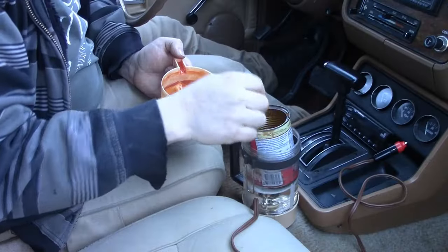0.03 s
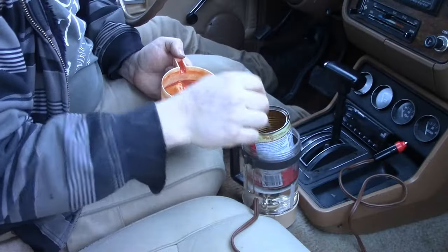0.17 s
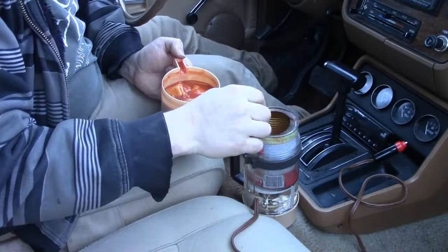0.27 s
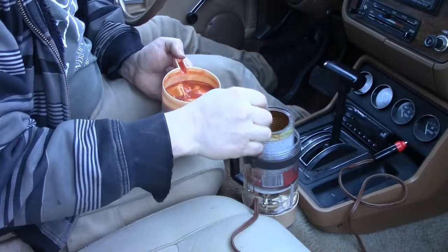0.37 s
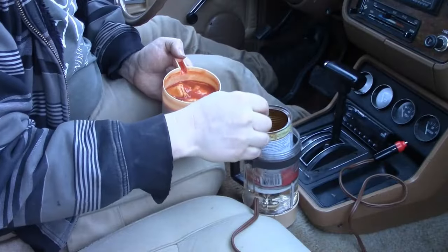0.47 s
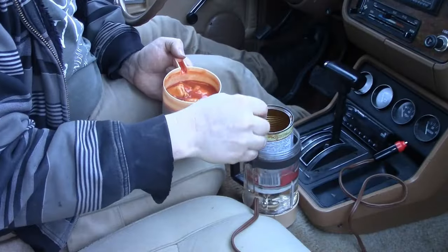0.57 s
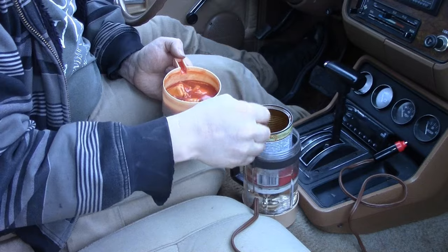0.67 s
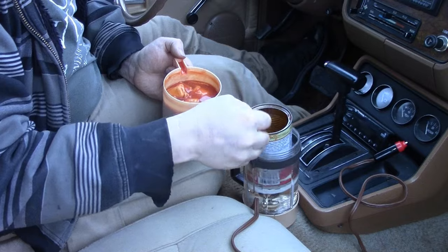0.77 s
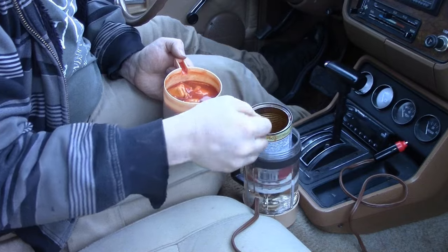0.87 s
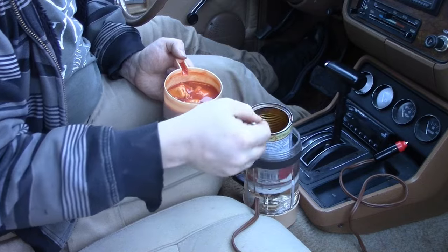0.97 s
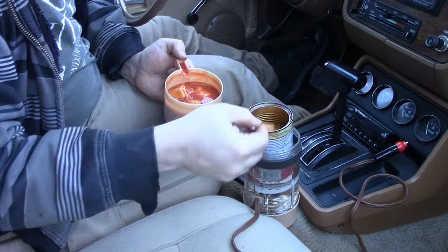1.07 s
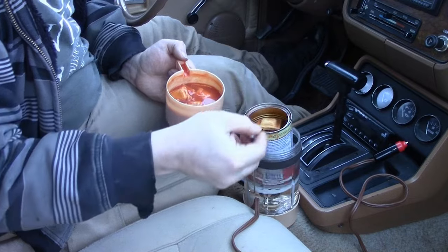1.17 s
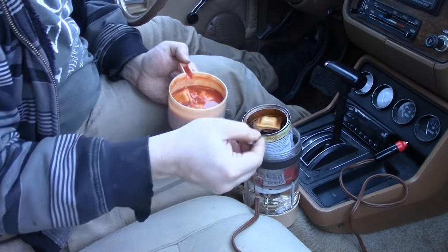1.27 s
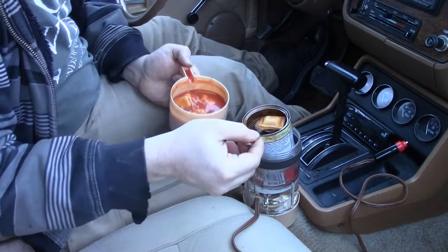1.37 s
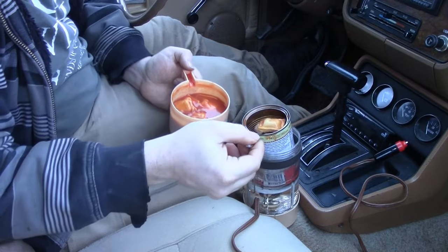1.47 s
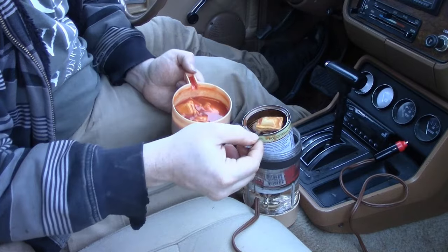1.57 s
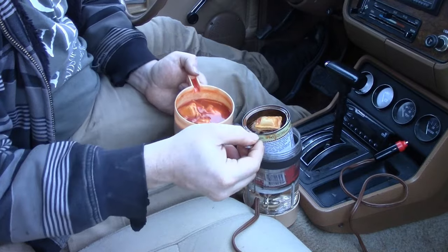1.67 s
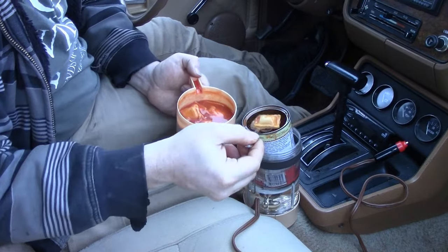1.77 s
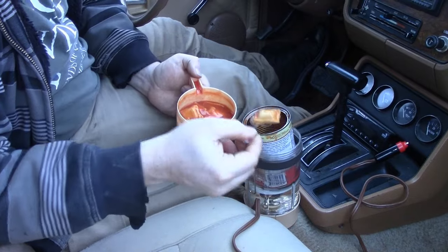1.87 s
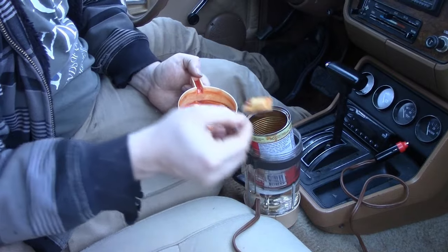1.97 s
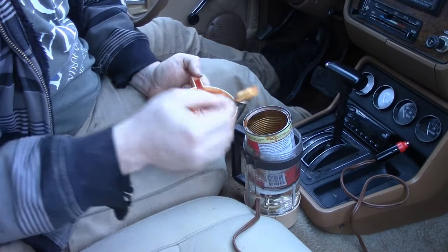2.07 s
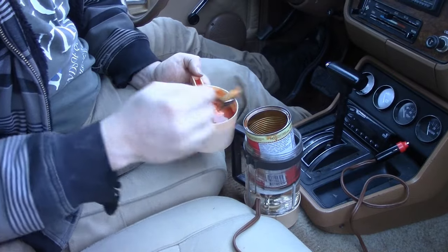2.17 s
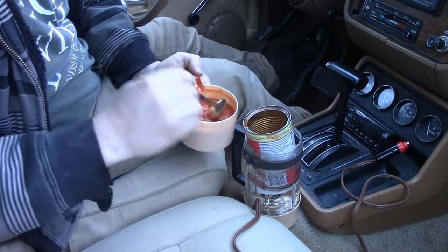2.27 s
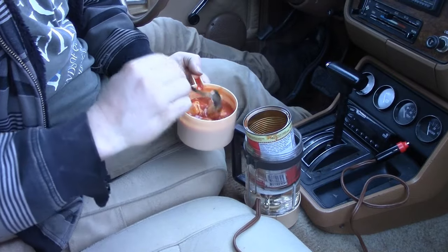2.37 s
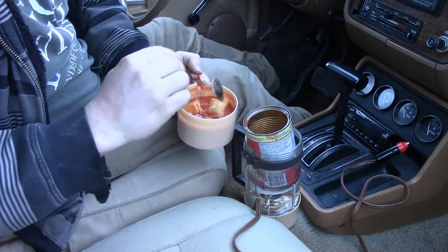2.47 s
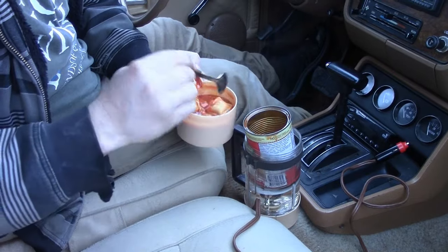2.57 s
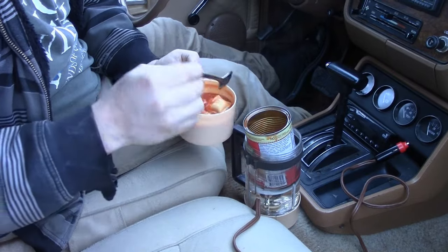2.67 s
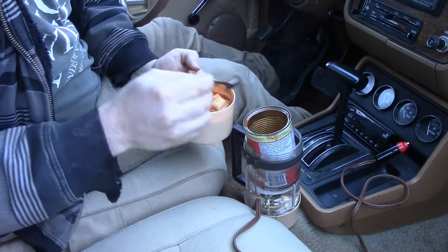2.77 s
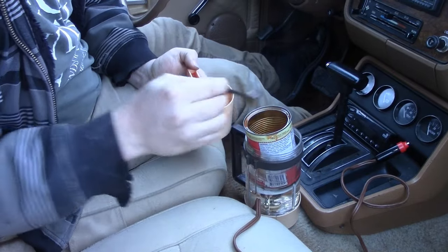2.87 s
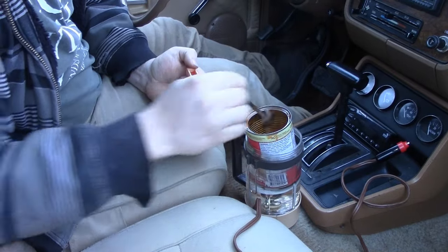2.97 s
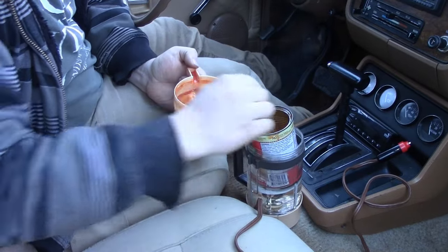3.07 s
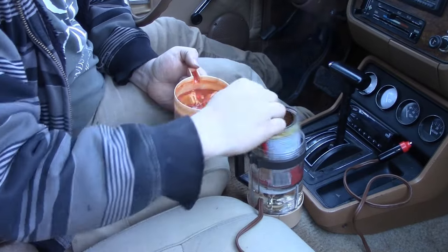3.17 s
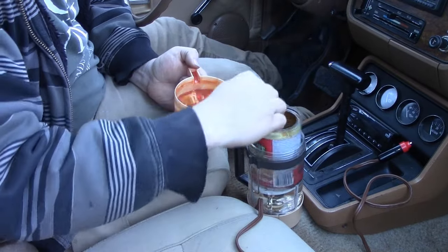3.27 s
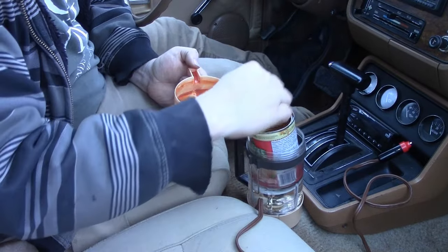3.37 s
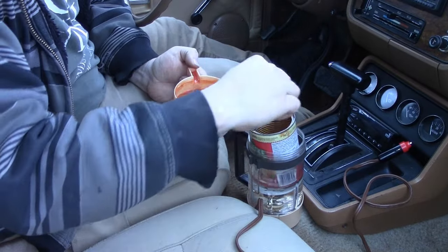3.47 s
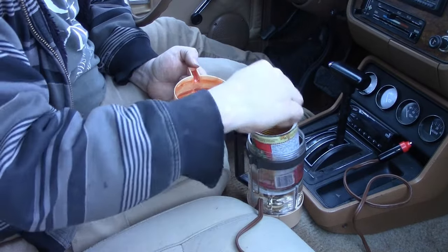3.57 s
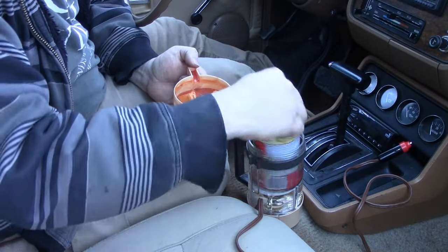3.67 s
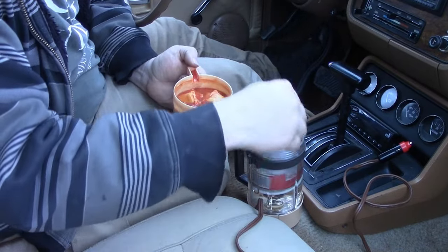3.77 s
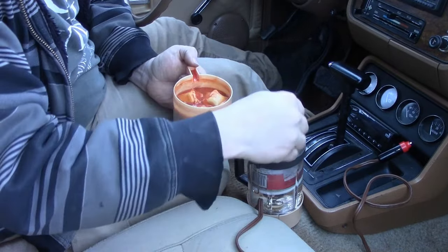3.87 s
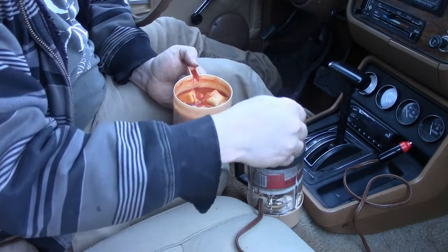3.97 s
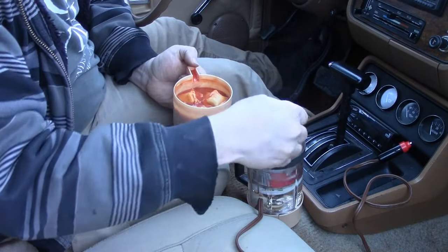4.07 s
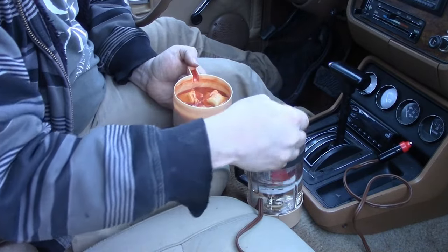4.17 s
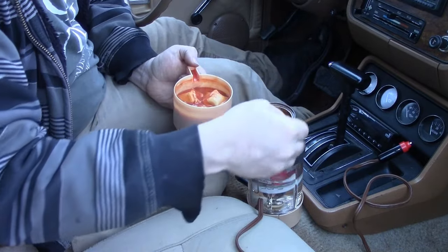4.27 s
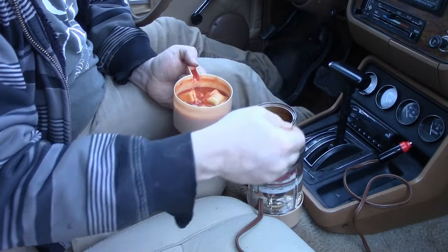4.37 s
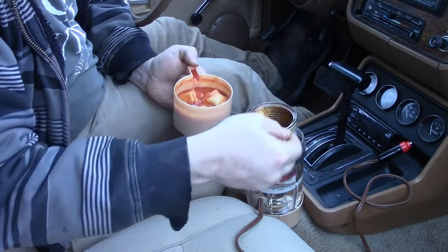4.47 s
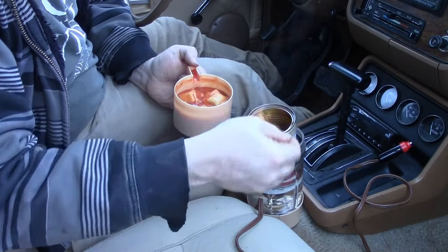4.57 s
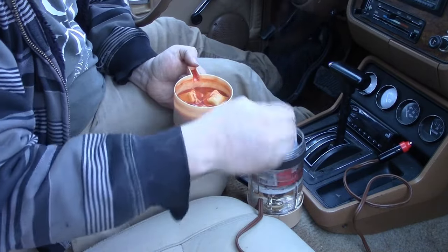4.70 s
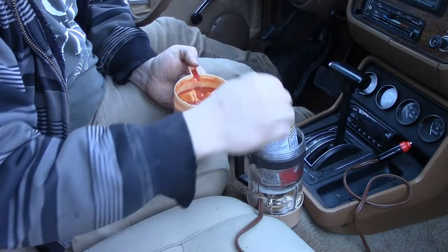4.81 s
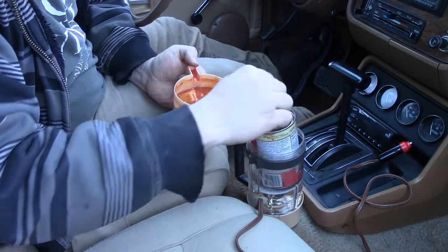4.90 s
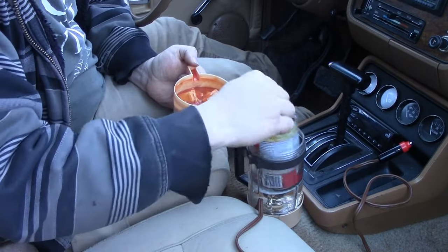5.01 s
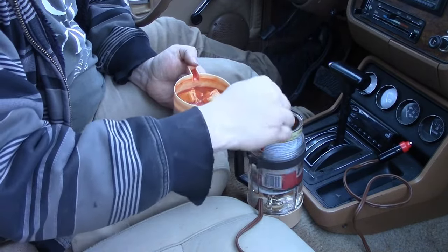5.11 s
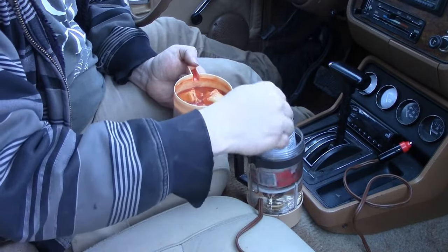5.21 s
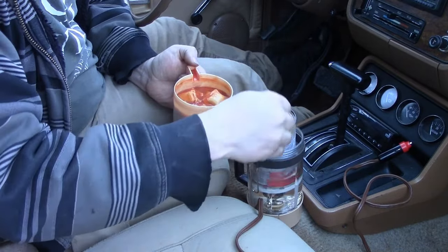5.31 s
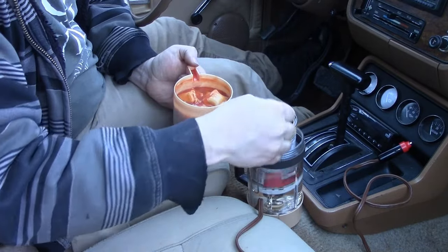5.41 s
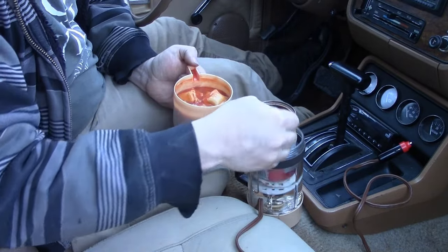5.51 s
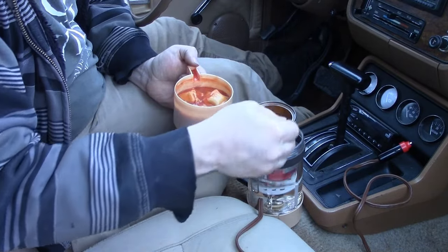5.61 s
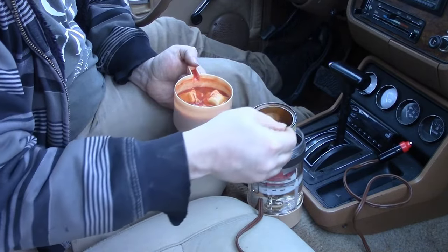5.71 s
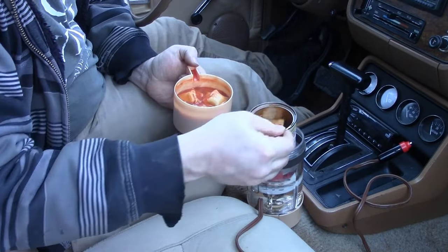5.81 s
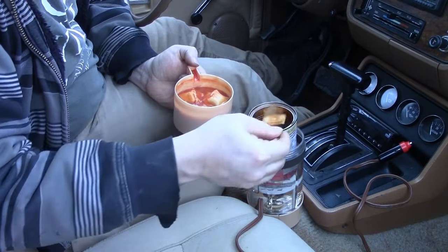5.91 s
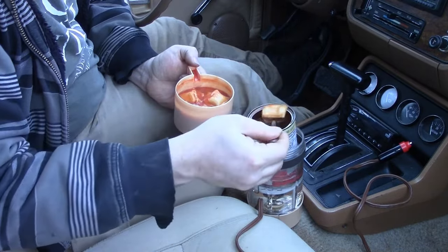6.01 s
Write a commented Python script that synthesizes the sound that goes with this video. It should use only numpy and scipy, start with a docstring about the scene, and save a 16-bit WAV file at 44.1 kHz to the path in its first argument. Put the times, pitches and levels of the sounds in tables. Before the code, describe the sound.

A spoon clinks against a thin ribbed can held in a car console, close to the microphone. Short tinny rings mix with gritty rubbing and low bumps. A fast purr of ticks rises over the ribs, followed by a pause with only soft cabin noise. A hard clink restarts the digging; small scrapes and taps gather into two strong knocks, then another rib rattle and soft scuffing. The padded cabin gives only a brief reflection.

```python
"""In the small padded cabin of a parked car, a spoon digs in a half-empty tin can held in the console.
It clinks on the wall and rattles up over the ribs, ringing wall modes, air column and cup holder as decaying
sines plus a noise crack. In between it rubs: clumped noise through the same tin, over a console rumble.
The cabin answers at once with a short noise tail; a faint wavering hum and steady hiss lie underneath."""
import sys
import numpy as np
from scipy import signal
from scipy.fft import rfft, irfft, next_fast_len
from scipy.io import wavfile
from scipy.ndimage import uniform_filter1d, map_coordinates

SR = 44100
rng = np.random.default_rng(int(sys.argv[2]) if len(sys.argv) > 2 else 0)


def transcribe(u):
    """Save the signal u as a 16-bit wav file named by the first command-line argument.

    u: samples, shape (n,) or (channels, n), limited to [-1, 1]; the rate is SR.
    q: integer samples, one column per channel.
    """
    v = np.clip(np.atleast_2d(u).T, -1, 1)
    q = np.round(v * 32767).astype(np.int16)
    wavfile.write(sys.argv[1], SR, q)


N = 266805


def amp(db):
    """dB to gain."""
    return 10 ** (np.asarray(db) / 20)


def unit(x):
    """x at rms 1."""
    return x / np.sqrt(np.mean(x ** 2) + 1e-20)


def along(points, hz):
    """Read (Hz, value) points on a log frequency axis."""
    point_hz, values = np.transpose(points)
    return np.interp(np.log(hz + 1), np.log(point_hz + 1), values)


def curves(rows):
    """One value per sample for each column after the time."""
    s, *columns = np.transpose(rows)
    return [np.interp(np.arange(N) / SR, s, column) for column in columns]


def wobble(rate):
    """A smooth random curve, rate knots a second."""
    knots = rng.standard_normal(int(N * rate / SR) + 4)
    return map_coordinates(knots, [np.arange(N) * rate / SR])


def filtered(x, response):
    """Shape x by a complex response of frequency, padded so that nothing wraps round."""
    n = x.shape[-1]
    m = next_fast_len(2 * n)
    return irfft(rfft(x, m) * response(np.fft.rfftfreq(m, 1 / SR)), m)[..., :n]


def stereo(mid, side):
    """Left and right from their sum and difference."""
    return np.array([mid + side, mid - side])


# Spectrum of the cabin air and microphone noise, relative: pitch_hz, level_db (per Hz)
HISS_SPECTRUM = [(12, -64), (20, -21.5), (69, -18.5), (84, -26.5), (108, -10), (135, -16), (279, -15.5),
                 (391, -18), (705, -20.5), (1200, -23), (1680, -23), (15000, -38), (16300, -51)]
# Left-right likeness of the hiss: pitch_hz, likeness (0 to 1)
HISS_LIKENESS = [(60, 0.86), (240, 0.1783), (950, 0.27), (3770, 0.28), (15000, 0.67)]
HISS_DB = -63.5  # rms over both channels


def hiss():
    """Steady cabin air and microphone noise: shaped noise, its width set by frequency."""
    def response(hz):
        turn = np.arccos(np.clip(along(HISS_LIKENESS, hz), -1, 1)) / 2
        notch = 1 - .75 * np.exp(-((hz - 104) / 18) ** 2)  # room for the hum
        return amp(along(HISS_SPECTRUM, hz)) * notch * [np.cos(turn), np.sin(turn)]
    mid, side = filtered(rng.standard_normal((2, N)), response)
    return amp(HISS_DB) * unit(stereo(mid, side))


# Swells of the hum: time_s, level_db (rms)
HUM_SWELLS = [(0.0, -69), (0.13, -78), (0.89, -67), (1.4, -78), (1.87, -63), (2.19, -73.5), (2.73, -61),
              (3.2, -76.5), (3.25, -86.5), (4.24, -58.5), (4.43, -87), (5.15, -93), (5.24, -59.5),
              (6.05, -90)]


def hum():
    """A low sine that swells, its pitch wavering smoothly about 104 Hz."""
    db, = curves(HUM_SWELLS)
    hz = 103.8 + 1.2 * wobble(4)
    return np.sqrt(2) * amp(db) * np.sin(2 * np.pi * np.cumsum(hz) / SR)


# Decay of the padded cabin: pitch_hz, t60_s
CABIN_DECAY = [(300, 0.14), (2000, 0.077), (10000, 0.028)]
# Colour of the cabin's answer before levelling: pitch_hz, level_db, likeness (left-right, 0 to 1)
CABIN_ANSWER = [(300, -5, .93), (2000, -3, .94), (5000, 0.5, .8), (12000, 0.5, .7)]


def cabin(x, wet_db):
    """Direct sound plus the cabin's short answer: a noise tail that dies fastest in the treble."""
    hz, t, tail = signal.stft(rng.standard_normal((2, SR // 12)), SR, nperseg=128)
    at, db, alike = np.transpose(CABIN_ANSWER)
    turn = np.arccos(along(np.c_[at, alike], hz))[:, None] / 2
    tail_db = along(np.c_[at, db], hz)[:, None] - 60 * t / along(CABIN_DECAY, hz)[:, None]
    tail = tail * amp(tail_db) * [np.cos(turn), np.sin(turn)]
    mid, side = signal.istft(tail, SR, nperseg=128)[1]
    answer = stereo(mid, side) / np.linalg.norm(mid)
    late = np.pad(x, (60, 0))[None]  # the answer starts 60 samples after the direct sound
    wet = signal.fftconvolve(late, answer, axes=1)
    return x + amp(wet_db) * wet[:, :len(x)]


# Times the spoon is inside the can: start_s, end_s
SPOON_IN_CAN = [(0, 1.6), (3.2, 6.1)]
# Levels while the spoon merely stirs: rub_db, swish_db, boom_db
STIRRING = (-77, -77, -68.5)
# Scuffs between the knocks: peak_s, span_s (swell or fade by about 17 dB; below 0.01 plays as 0.01),
# rub_db, swish_db, boom_db
SCUFF_SWELLS = [(.03, -1.2, -63, -86, -53.5), (0.224, 0.04, -70, -85, -48), (0.388, 0.1, -51, -59, -46),
                (.55, 0.11, -50.5, -62, -46), (0.781, 0.03, -54.5, -73, -50), (.85, 0.66, -70, -67.5, -65),
                (1.032, 0.1239, -35, -42, -45.5), (1.12, 0.19, -49, -65, -52),
                (1.236, 0.15, -62, -82, -51.5), (3.3, 0.104, -48.5, -58.5, -44),
                (3.52, -0.45, -59.5, -79, -47), (3.7, 0.0662, -66, -68, -46.5),
                (3.79, 0.02, -48, -57, -46.5), (3.883, 0.0669, -56, -67, -45),
                (4.077, 0.02, -62.5, -68, -54.5), (4.258, 0.06, -58.5, -67, -47.5),
                (4.43, 0.18, -84, -87, -57.5), (4.62, 0.07, -66, -70, -57.5),
                (4.902, 0.2, -59.5, -82, -54.5), (5.075, .05, -49, -70, -67),
                (5.105, 0.04, -49.5, -50, -68), (5.216, 0.3, -54.5, -79, -46.5),
                (5.408, -0.14, -50, -63, -49), (5.68, 0.26, -75, -80, -47.5),
                (5.85, -0.25, -49.5, -78, -50), (5.98, 0.33, -57.5, -66, -57.5)]
SCUFF_CREST = 0.19  # rounded share of the swell


def scuffing():
    """Gains of wall rubbing, swish and boom: steady stirring plus scuffs that swell and fade alike."""
    t = np.arange(N) / SR
    inside = sum(1. * (t >= start) * (t < end) for start, end in SPOON_IN_CAN)
    gain = amp(np.reshape(STIRRING, (-1, 1))) * uniform_filter1d(inside, size=SR // 10)
    for peak, span, *db in SCUFF_SWELLS:
        distance = np.hypot((t - peak) / max(span, .01), SCUFF_CREST) - SCUFF_CREST
        gain = np.hypot(gain, amp(np.reshape(db, (-1, 1))) * amp(-20 * distance))
    return gain


# Spectrum of the console rumble, relative: pitch_hz, level_db (per Hz)
RUMBLE_SPECTRUM = [(12, -31.5), (22, -3.5), (60, -5.5), (95, -3), (125, -5), (165, -2), (220, -16.5),
                   (300, -13), (420, -24), (880, -120)]
RUMBLE_DB, RUMBLE_REST_DB = -9.5, -78  # re the boom; at rest
RUMBLE_AVERAGE_S = .3  # the boom is averaged over this long


def rumble(boom_gain):
    """The hand shakes can and console: lumpy low noise that follows the averaged boom."""
    smooth_boom = uniform_filter1d(boom_gain, int(RUMBLE_AVERAGE_S * SR))
    gain = amp(RUMBLE_DB) * smooth_boom + amp(RUMBLE_REST_DB)
    lumps = amp(2.5 * wobble(12))
    shake, sway = filtered(rng.standard_normal((2, N)) * lumps, lambda f: amp(along(RUMBLE_SPECTRUM, f)))
    return gain * unit(stereo(shake, amp(-16) * sway))


def resonant(modes, blur):
    """Response of (Hz, dB, t60) modes, each widened by blur."""
    def response(f):
        total = 0
        for k, (centre, db, t60) in enumerate(modes):
            width = blur / t60
            total = total + (-1) ** k * amp(db) * 1j * f * width / (centre ** 2 - f * f + 1j * f * width)
        return total
    return response


# Wall modes of the tin, shared with the contacts: pitch_hz, level_db (relative), t60_s (before damping)
TIN_MODES = [(899.3, 0, 0.067), (1042, -1.5, 0.051), (1150.6, 1, 0.043), (1247, -4.5, 0.068),
             (1345, -7, 0.089), (1647, -2.5, 0.029), (1825, -4.5, 0.055), (1957, 0, 0.045),
             (2092, 1.5, 0.035), (2449, 3.5, 0.018), (2584, -5, 0.015), (2745, -5, 0.039), (3052, 1, 0.02),
             (3297, 2.5, 0.023), (3700, -1, 0.025), (3650, -28.5, .05), (4046, -8, 0.029),
             (4120, -11, 0.044), (4508, -2.5, 0.027), (4460, -27, 0.069), (4900, -6.5, 0.019),
             (5000, -23, .04), (5570, -6, 0.013), (6360, -5, 0.045), (6800, 0, 0.052), (7280, -7, 0.065),
             (8040, -11.5, 0.087), (8440, -6.5, 0.0354), (7600, -20.5, 0.012), (9000, -19.5, 0.12)]
# Spectrum of the spoon's edge, shared with the contacts, before a treble tilt: pitch_hz, level_db (per Hz)
EDGE_SPECTRUM = [(880, -35.5), (1500, -7), (2000, -3), (2840, -9), (3540, -5), (4820, -14.5),
                 (10300, -23.5), (15200, -38), (16300, -39)]


def edge_response(f, tilt):
    """The spoon edge's colour, thinned below 5.5 kHz."""
    return amp(along(EDGE_SPECTRUM, f)) * np.minimum(f / 5500, 1) ** tilt


def rubbing():
    """Clumped grains of friction excite the same tin as the contacts; the console rumbles along."""
    rub_gain, swish_gain, boom_gain = scuffing()
    clumps = 2 * wobble(70)
    grains = lambda: rng.standard_normal(N) * amp(clumps + 3.1 * wobble(500))
    high = resonant([m for m in TIN_MODES if 1500 < m[0] < 4900], blur=5.4)
    hollow = [(305.0, 3.2, 0.098), (665, 5.7, 0.15)]  # two deep modes below the wall's own
    low = resonant(hollow + [m for m in TIN_MODES if m[0] < 1500], blur=11.0)
    # a soft, wet contact passes less of the upper modes
    rub = unit(filtered(grains(), lambda f: high(f) / (1 + (f / 3600) ** 4)))
    swish = unit(filtered(grains(), lambda f: edge_response(f, tilt=3)))
    boom = unit(filtered(grains(), low))
    scraped = rub_gain * rub + swish_gain * swish + boom_gain * boom
    return cabin(scraped, wet_db=-11) + rumble(boom_gain)


def ring(t, hz, db, t60, rise, hold, phase=0):
    """Sum of sines that build up over rise seconds, are fed for hold seconds, then die."""
    col = lambda v: np.reshape(v, (-1, 1))
    free = (t ** 4 + hold ** 4) ** .25 - hold  # stays near zero while the sine is fed
    sines = amp(col(db) - 60 * free / col(t60)) * np.sin(2 * np.pi * col(hz) * t + col(phase))
    return sines.sum(0) * (1 - np.exp(-t / rise))


# How much a full-scale blow at 2 kHz favours the modes at its spot; more per dB of blow, per octave up
FOCUS_DB, FOCUS_GROWS, FOCUS_DB_PER_OCTAVE = 16, .3, 6.5


def wall_ring(t, db, wall_hz, low_hz, low_db, edge_db, hold, damping):
    """Tin wall: the spot struck favours nearby modes and pulls the nearest to its own pitch."""
    hz, level, t60 = np.transpose(TIN_MODES)
    low, high = hz < 1500, hz > 4900
    focus_db = FOCUS_DB + FOCUS_GROWS * db + FOCUS_DB_PER_OCTAVE * np.log2(wall_hz / 2000)
    off = np.log(np.where(low, low_hz, wall_hz) / hz)
    favour = np.where(low, 12, focus_db) * np.tanh((off / 0.11) ** 2)
    share = level - favour + 3.5 * rng.standard_normal(len(hz))
    pull = off * np.exp(-(off / 0.044) ** 2)
    loaded_hz = hz * np.exp(pull + 0.0074 * rng.standard_normal(len(hz)))
    # each group of modes divides the energy that the blow gives it
    for group, group_db in (low, low_db + 3.5), (high, edge_db - 8.0), (~low & ~high, -2):
        share[group] += group_db - 20 * np.log10(np.linalg.norm(amp(share[group])))
    life = t60 / np.where(low, damping ** .6, np.where(high, 1.3 * damping ** .4, damping))
    phase = 2 * np.pi * rng.random(len(hz))
    return ring(t, loaded_hz, share, life, 0.00019 + 0.17 * hold, 0.5 * hold, phase)


def air_column(t, hz, db, hold, damping):
    """The can's air column booms as one short sine."""
    return ring(t, hz, db + 2.5, .045 / damping, 0.00047 + .3 * hold, 1.8 * hold)


def cup_holder(t, db, hold):
    """The cup holder knocks on two low modes."""
    return ring(t, [275, 315], db + np.array([-4, 2.5]), [.05, .07], 0.0068, 0.77 * hold)


def edge_crack(t, db, hold, grit):
    """The spoon's edge cracks: a burst of bright noise, longer for a longer contact."""
    fading = np.sqrt(t * t + (0.5 * hold) ** 2) - 0.27 * hold
    return amp(db + 5 - 60 * fading / 0.024) * (1 - np.exp(-t / (0.00012 + 0.064 * hold))) * grit


# Spoon and hand in the mouth of the can retune it: time_s, air_hz (air column), low_hz (low wall centre)
CAN_TUNING = [(0, 690, 1154), (.3, 681, 1250), (.48, 719, 1250), (.7, 660, 1345), (.9, 723, 1270),
              (.96, 747, 986), (1.25, 805, 1016), (1.35, 640, 1172), (3.2, 690.5, 1216), (3.45, 662, 1060),
              (3.57, 707, 1125), (3.68, 660, 1190), (3.86, 747, 1370), (4.16, 657, 1090), (4.6, 610, 1000),
              (4.92, 684, 1200), (5.03, 723, 1220), (5.18, 657, 1195), (5.4, 685, 1320), (5.6, 654, 1016),
              (5.9, 645, 1116)]
# Single knocks: start_s, level_db (whole blow), wall_hz (ring centre), then re the blow before each part's
# own trim: edge_db, air_db, low_db (low wall), holder_db; contact_s, damping (factor)
KNOCK_LIST = [(0.0307, -37.5, 3140, -26, -15, -10, -7.5, 0.018, 4.9),
              (0.173, -17.5, 3305, -8.5, -14.5, -14.5, -18.5, 0.0011, 0.44),
              (.2987, -12.5, 2750, -8.5, -1.5, -16, -16, 0.0077, 0.83),
              (0.357, -15.5, 1805, -19, -16, -18, -20, 0.0017, 2.9),
              (.3844, -35.5, 2460, -15, 1, -30, -12, .0068, 2.5),
              (0.4735, -25, 2520, -8.5, -5, -16.5, -13, 0.004, 0.9),
              (.5087, -34.5, 2020, -29, -5.5, -10, -28, 0.0054, 1.3),
              (0.5476, -33, 3360, -17, -12, -11.5, -27, 0.0055, 0.87),
              (.629, -16, 2630, -23, -14, -20, -14, 0.0025, 1.8),
              (0.6921, -22.5, 2800, -11.5, -10, -16.5, -10.5, .0031, 1.16),
              (.7517, -44.5, 2150, -27, -11, -7, -16, 0.0062, .72),
              (.825, -36, 2140, -14.5, -15, -17, -19, 0.0087, 0.94),
              (1.3578, -50, 2030, -18, -4.5, -4, -15, .013, 0.3),
              (1.506, -28, 3510, -18, -12.5, -16, -25, 0.0078, 1.4),
              (1.7177, -44, 3360, -12.5, -12.5, -9, -14, 0.0056, 0.99),
              (3.2034, -9, 2810, -14, -12, -15, -13.5, 0.0019, 1.08),
              (3.2665, -44, 1940, -24, 8, -6, -7, 0.0033, 1.6),
              (3.2804, -33, 1910, -15, -6, -25, -12, 0.0031, 1.3),
              (3.3079, -22, 1730, -17.5, -29, -19, -26, 0.0042, 2.1),
              (3.3187, -34.5, 3000, -1.5, -10, -10, -6.5, 0.012, 0.71),
              (3.4519, -22, 2300, -18, -13.5, -6.5, -6.5, 0.0062, 1.16),
              (3.5434, -39.5, 2000, -28, -11, -9, -5, 0.011, 0.86),
              (3.567, -30, 1866, -6, -6.5, -3.5, -6, 0.0021, 0.63),
              (3.5964, -38.5, 2030, -34, -2.5, -2, -17, 0.0029, 0.86),
              (3.6584, -24, 2690, -8.5, -15, -10, -17, 0.009, 1.5),
              (3.699, -34.5, 2230, -19, -27, -14, -7, 0.014, .94),
              (3.74, -39, 3000, -21.5, -16, -9, -9, 0.0046, 1.1),
              (3.7733, -40, 2230, -26, -12, -24, -3, .0077, 1.5),
              (3.7978, -21.5, 2710, -23, -18, -19.5, -26, 0.0051, 2.2),
              (3.8548, -33.5, 2670, -12, -25, -16, -16, 0.0069, 1.1),
              (3.8658, -24.5, 2770, -13, -28, -16, -18, 0.0039, 0.77),
              (4.0044, -39.5, 2100, -21, -24, -22, -9, 0.0054, 1.5),
              (4.1609, -29, 2990, -18, -21.5, -14.5, -8, 0.0031, 1.1),
              (4.2238, -29.5, 3060, -20.5, -11.5, -7.5, -27, 0.0042, 1.5),
              (4.3208, -42, 2080, -19.5, -11, -7.5, -8, 0.0078, 1.4),
              (4.3961, -41.5, 2370, -28, -5, -11, -6, 0.015, 1.7),
              (4.4593, -44.5, 3150, -24, -14, -6, -7, 0.014, 1.2),
              (4.5632, -20.5, 3655, -16.5, -18.5, -18.5, -37, 0.0075, 1.6),
              (4.6933, -41, 2060, -21, -29, -10, -14, .006, 1.4),
              (4.8034, -44.5, 2070, -25, -13, -10, -8, 0.013, 2),
              (4.8783, -36.5, 3080, -21, -18, -14, -20, .0046, 0.92),
              (4.9145, -29.5, 1760, -5, -11, -3.5, -17, 0.0089, 0.54),
              (5.0316, -11, 2840, -13.5, -11.5, -22, -23, 0.0047, 3),
              (5.149, -37.5, 2400, -24, -16, -16, -23, 0.0043, 1.2),
              (5.1714, -18.5, 2600, -5, -33, -29, -46, 0.024, .59),
              (5.1796, -4.5, 2893, -20, -23.5, -26, -27.5, 0.0042, 2.25),
              (5.2935, -32, 2150, -20, -10.5, -11.5, -23, 0.005, 1.8),
              (5.3226, -37, 2100, -19, -18, -9, -21, .0074, 0.66),
              (5.3564, -27.5, 2250, -15.5, -12.5, -9.5, -21, 0.0032, 1.2),
              (5.3792, -32.5, 2015, -15, -11, -11, -4, 0.0038, 1.1),
              (5.399, -37, 2540, -16.5, -11, -14, -23, 0.009, 1.1),
              (5.4986, -34.5, 2130, -36, -34, -17, -12, 0.0045, 2.2),
              (5.5278, -33, 3250, -19, -13, -13, -36, 0.0085, 0.63),
              (5.9349, -41, 3070, -38, -7, -9, -18, .0091, 1.4)]
RATTLE_DB, RATTLE_HZ = 2, 500  # the loose can chatters while it rings: depth, knots a second


def contacts():
    """Each contact rings the wall modes nearest its spot, the air column and the holder."""
    out, t = np.zeros((2, N + SR)), np.arange(SR // 11) / SR
    air_hz, low_hz = curves(CAN_TUNING)
    chatter = unit(amp(RATTLE_DB * np.pad(wobble(RATTLE_HZ), (0, SR))))
    grit = unit(filtered(rng.standard_normal(N + SR), lambda f: edge_response(f, tilt=2.11)))
    for s, db, wall_hz, edge_db, air_db, low_db, holder_db, hold, damping in KNOCK_LIST + rib_ticks():
        hold, damping, k = max(hold, 1e-4), max(damping, .3), round(s * SR)
        here = slice(k, k + len(t))
        wall = wall_ring(t, db, wall_hz, low_hz[k], low_db, edge_db, hold, damping)
        rattled = wall * chatter[here]
        wall = rattled * np.linalg.norm(wall) / np.linalg.norm(rattled)  # chatter keeps the energy
        air = air_column(t, air_hz[k], air_db, hold, damping)
        holder = cup_holder(t, holder_db, hold)
        crack = edge_crack(t, edge_db, hold, grit[here])
        blow = wall + air + holder + crack
        heard = cabin(blow, wet_db=-4.0)
        # the cabin adds no energy to the left-right average of the blow
        out[:, here] += amp(db) * heard * np.linalg.norm(blow) / np.linalg.norm(heard.mean(0))
    return out[:, :N]


# The spoon is drawn up the wall twice and ticks on every rib; for each climb: time_s, ribs_passed (count)
RIB_CLIMBS = [
    [(.9477, 0), (.9662, 1), (1.0234, 5), (1.0724, 8), (1.1323, 11), (1.1887, 14), (1.2146, 15),
     (1.2476, 16)],
    [(5.5533, 0), (5.5854, 2), (5.6416, 5), (5.6674, 6), (5.7124, 7), (5.7505, 8), (5.8215, 11)],
]
# Pressure along the climbs: time_s, level_db (before scatter), wall_hz (ring centre), air_db, low_db
# (both re the blow, before trim), lean (contact time over time between ribs), damping (factor)
CLIMB_PRESSURE = [(.948, -28.5, 4100, -10.5, -9, 0.17, 2.3), (.966, -24.5, 3470, -13, -5.5, .35, 2.5),
                  (1.0, -25.5, 3630, -12, -13.5, .3, .9), (1.07, -26.5, 3270, -6.5, -5.5, 0.28, .9),
                  (1.13, -23, 3310, -11, -7.5, 0.078, 2.8), (1.15, -28, 2000, -9, -12, 0.16, 1.5),
                  (1.19, -28, 2030, -7.5, -10.5, 0.15, 0.89), (1.216, -27.5, 3500, -10, -12, 0.062, 1.4),
                  (1.249, -31, 2040, -17, -12.5, 0.31, 1.4), (5.55, -18, 1860, -11, -15, 0.36, 1.5),
                  (5.579, -22, 1936, -8, -15, 0.39, .8), (5.615, -23, 2060, -7.5, -15, 0.41, 1.4),
                  (5.65, -22.5, 2460, -13, -8, 0.2, .7), (5.715, -22, 2456, -24, -12, 0.22, 1),
                  (5.75, -27, 3680, -16.5, -6.5, 0.28, 1.3), (5.83, -28, 3680, -9.5, -8, 0.27, 1.1)]
# What the ticks of each climb share, re the blow before trim: edge_db, holder_db
CLIMB_TICKS = [(-10.5, -46), (-13, -20.5)]
TICK_SCATTER_DB = 1


def rib_ticks():
    """One contact per rib that the rising spoon passes; the slower it moves, the longer it leans."""
    rows = []
    at, *press = np.transpose(CLIMB_PRESSURE)
    for climb, (edge_db, holder_db) in zip(RIB_CLIMBS, CLIMB_TICKS):
        s, ribs = np.transpose(climb)
        times = np.interp(np.arange(ribs[-1] + 1), ribs, s)
        for when, gap in zip(times, np.gradient(times)):
            db, wall_hz, air_db, low_db, lean, damping = (np.interp(when, at, c) for c in press)
            db += TICK_SCATTER_DB * rng.standard_normal()
            rows.append((when, db, wall_hz, edge_db, air_db, low_db, holder_db, lean * gap, damping))
    return rows


# Slight left-right balance of the can by pitch: pitch_hz, balance_db (left minus right)
CAN_BALANCE = [(60, .3), (500, .6), (1200, -.5), (4000, -.8), (12000, -.1)]


def scene():
    """The can's lows sit a touch left, its upper ring a touch right; hum and hiss fill the cabin."""
    can = contacts() + rubbing()
    can = filtered(can, lambda hz: amp(along(CAN_BALANCE, hz) * np.array([[.5], [-.5]])))
    return can + hum() + hiss()


TOP_HZ = 16000  # middle of the treble cut


def record(dry):
    """Band limit: the treble slopes to nothing across 800 Hz."""
    return filtered(dry, lambda hz: np.clip((TOP_HZ + 400 - hz) / 800, 0, 1) ** 2)


dry = scene()
out = record(dry)
transcribe(out)
```